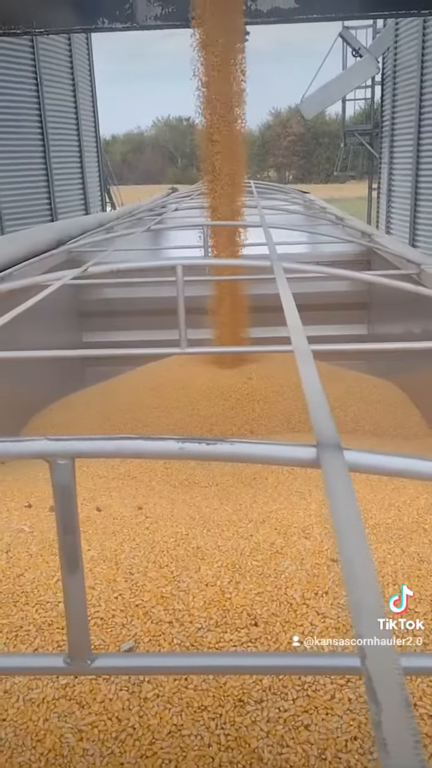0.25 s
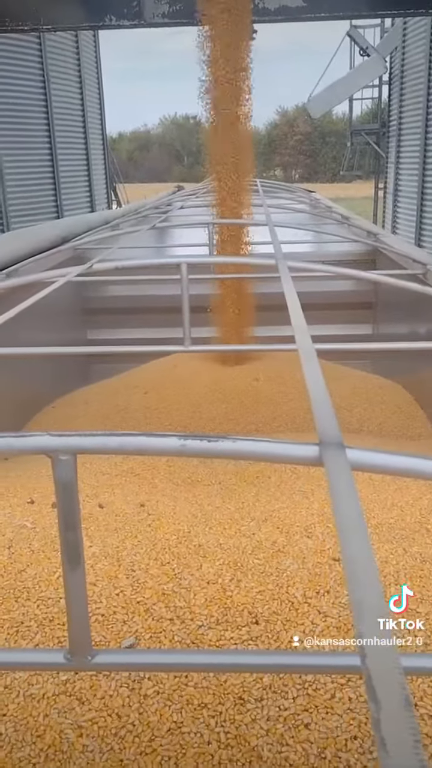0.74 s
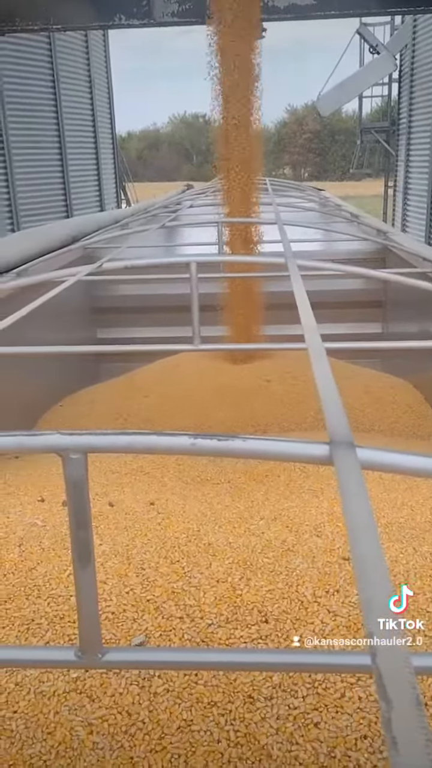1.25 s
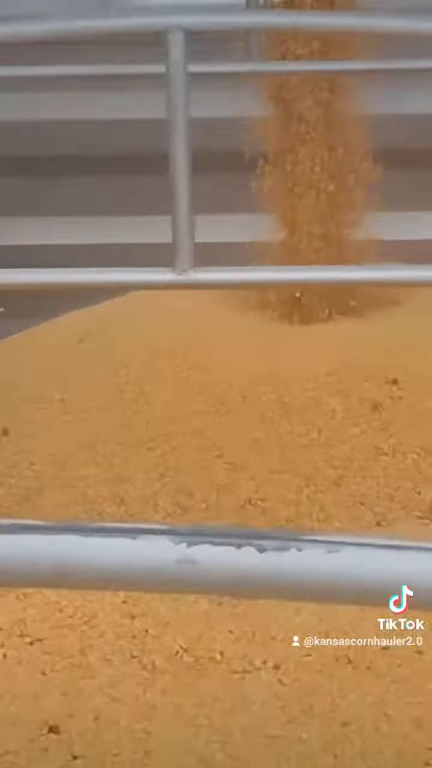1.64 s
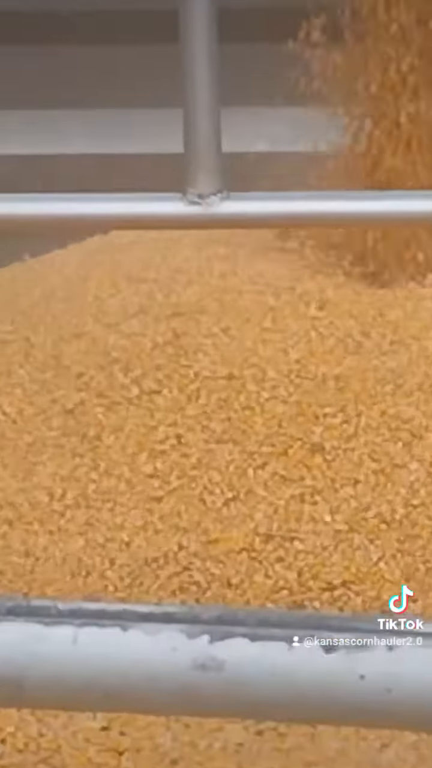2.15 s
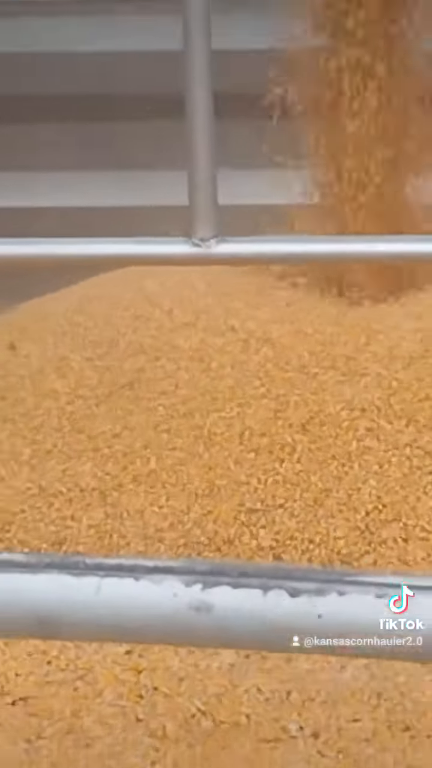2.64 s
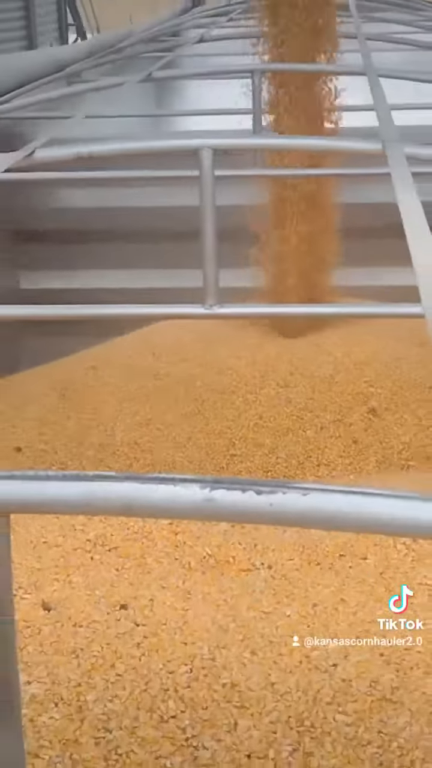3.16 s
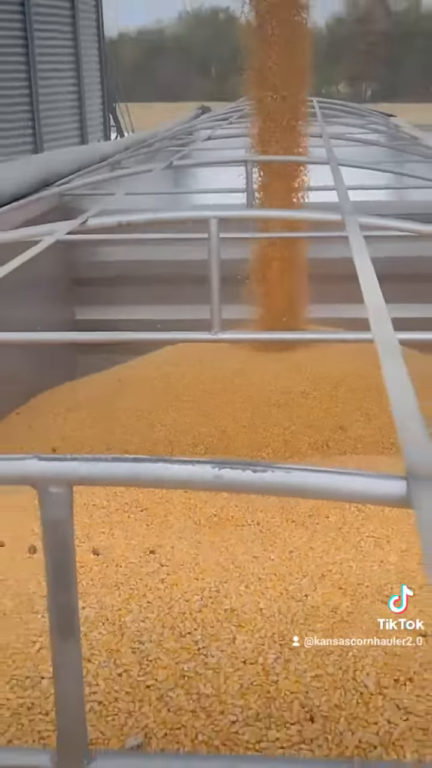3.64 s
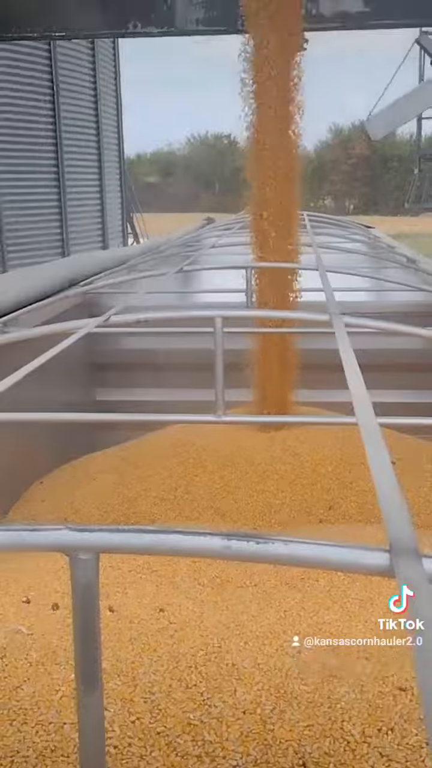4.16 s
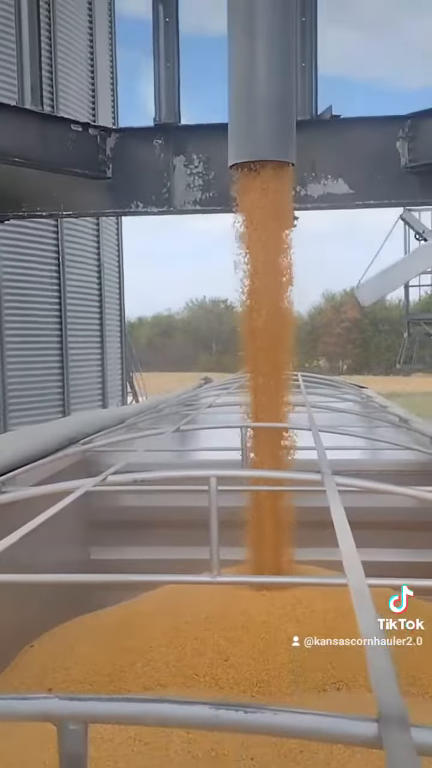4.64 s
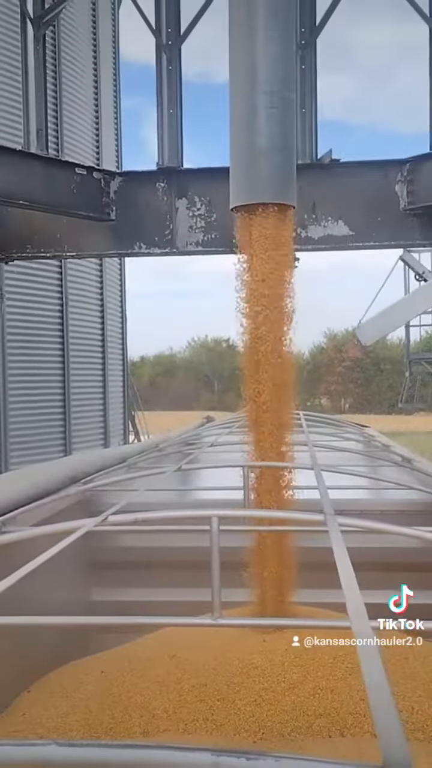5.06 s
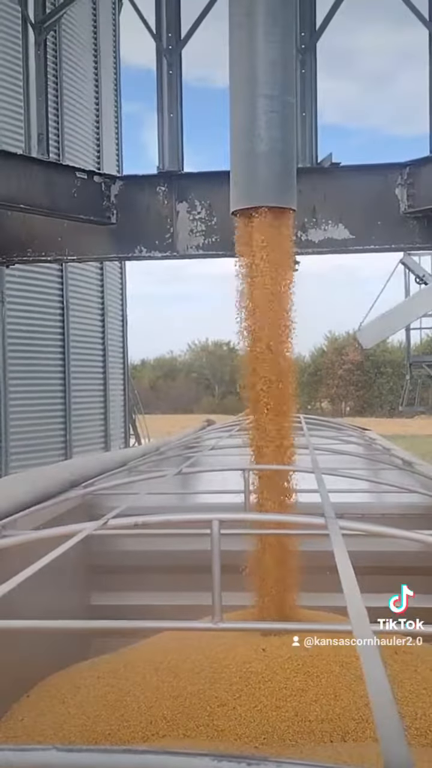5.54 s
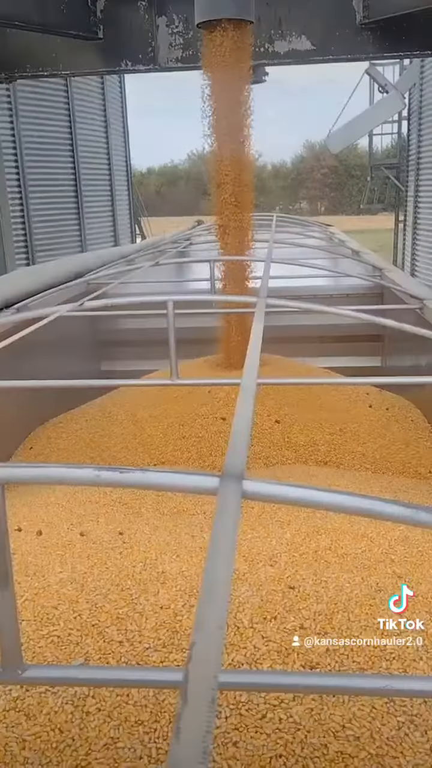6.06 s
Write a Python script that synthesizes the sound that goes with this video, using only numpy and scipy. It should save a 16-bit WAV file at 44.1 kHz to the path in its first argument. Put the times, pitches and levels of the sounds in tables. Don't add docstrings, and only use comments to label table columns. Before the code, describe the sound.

A continuous torrent of shelled corn falls onto a heap in a steel trailer outdoors: bright, grainy hiss and kernel clatter, dull wall drumming, low conveyor and fan hum. It starts loud, then sinks within two seconds as the microphone adjusts. Tiny metallic ticks and low wind buffets pass. Near the end everything cuts to silence for a third of a second, then fades back louder.

```python
import sys
import numpy as np
from scipy import signal
from scipy.fft import rfft, irfft, next_fast_len
from scipy.io import wavfile
from scipy.ndimage import uniform_filter1d, map_coordinates

SR = 44100
rng = np.random.default_rng(int(sys.argv[2]) if len(sys.argv) > 2 else 0)


def store_wav(level_fs):
    pcm = np.round(np.clip(np.atleast_2d(level_fs), -1, 1) * 32767)
    wavfile.write(sys.argv[1], SR, pcm.T.astype(np.int16))


def makeup_ratio(level_db):
    decades = np.asarray(level_db, float) / 20
    return 10 ** decades


N = 277918


def unit(x):
    return x / np.sqrt(np.mean(x ** 2) + 1e-20)


def along(points, hz):
    f, v = np.transpose(points)
    return np.interp(np.log(hz + 1), np.log(f + 1), v)


def curves(tables):
    s, *cols = np.transpose(np.concatenate(tables))
    return [np.interp(np.arange(N) / SR, s, c) for c in cols]


def wobble(rate_hz):
    knots = rng.standard_normal(int(N * rate_hz / SR) + 4)
    return map_coordinates(knots, [np.arange(N) * rate_hz / SR])


def pan(left_right_db):
    return makeup_ratio(left_right_db * np.array([[.5], [-.5]]))


def filtered(x, response):
    m = next_fast_len(N + 8192)
    return irfft(rfft(x, m) * response(np.fft.rfftfreq(m, 1 / SR)), m)[..., :N]


# (frequency [Hz], correlation [-1 to 1])
PORT_LIKENESS = [(60, 0.91), (400, 0.89), (900, 0.35), (1300, 0.48), (1750, 0.058), (2200, 0.071),
                 (2700, 0.15), (3600, 0.11), (4400, 0.071), (5600, 0.17), (7500, 0.27), (10500, .08),
                 (12000, 0.36), (15000, .25)]
# (frequency [Hz], lead [rad])
RIGHT_LEAD = [(60, 0.08), (700, 0.63), (1500, 2.5), (2000, 0), (3600, 0.2), (6000, -1.7), (7500, 0.5),
              (8800, -1.2), (11000, -0.4), (12500, -1.2), (15000, -1.6)]


def stereo(pair, gain):
    def mid_side_gain(hz):
        angle = np.arccos(np.clip(along(PORT_LIKENESS, hz), -1, 1)) / 2
        return gain(hz) * [np.cos(angle), np.sin(angle)]

    def lead(hz):
        return np.exp(.5j * along(RIGHT_LEAD, hz) * np.array([[-1], [1]]))

    mid, side = filtered(pair, mid_side_gain)
    return unit(filtered(np.array([mid + side, mid - side]), lead))


def impacts(spectrum, spiky_db, patchy_db):
    size_db = spiky_db * np.minimum(rng.exponential(size=(2, N)), 5)
    clicks = rng.standard_normal((2, N)) * makeup_ratio(size_db)
    cells = signal.stft(clicks, nperseg=512)[2]
    patches = uniform_filter1d(rng.standard_normal(cells.shape[1:]), 6, 0)
    patches = unit(uniform_filter1d(patches, 12, 1))
    pair = signal.istft(cells * makeup_ratio(patchy_db * patches), nperseg=512)[1][:, :N]
    return stereo(pair, lambda hz: makeup_ratio(along(spectrum, hz)))


# (start [s], end [s])
DROPOUT = (5.516, 5.8625)
SETTLE_FROM_S, SETTLE_S = 0.72, 1


def settled():
    t = np.arange(N) / SR
    u = np.clip((t - SETTLE_FROM_S) / SETTLE_S, 0, 1)
    return u * u * (3 - 2 * u) * (t < DROPOUT[1])


# (time [s], raise [0-1])
RAISE = [
    [(0, 0.46), (3.6, 0.64), (4.3, 0.8), (5.5, 1), (5.87, 0.3), (6.3, 0.2)],
]


def phone_raised():
    return curves(RAISE)[0]


HISS_DB, SETTLED_DB = -20.5, -8
CLATTER_DB, SETTLED_CLATTER_DB, RAISED_CLATTER_DB = -6, -3.5, -0.44
WALLS_DB, SETTLED_WALLS_DB, RAISED_WALLS_DB, RESUMED_WALLS_DB = -4.5, 1.5, 0.5, 2.7
CLATTER_LAG = 1.7
# (frequency [Hz], density [dB per Hz])
HISS = [(4200, -42), (5500, -17.5), (6500, -3), (8600, -1.5), (10300, -1), (12500, 1), (14000, -2)]
# (frequency [Hz], density [dB per Hz])
CLATTER = [(1700, -36.5), (2400, -11.5), (3200, -3), (3900, -1), (5000, -1.5), (5900, -0.5), (7000, -4),
           (9000, -51.5)]
# (frequency [Hz], density [dB per Hz])
WALLS = [(190, -32), (330, -10.5), (408, -3.5), (444, -1.5), (483, -6.5), (634, -10.5), (1010, -11.5),
         (1110, -14), (1280, -10.5), (2500, -18.5), (3250, -25), (5500, -120)]
# (time [s], level [dB re steady])
FLOW = [(0, -1.5), (.1, -0.5), (.4, .5), (.75, 0), (1.7, .5), (2.4, 0.5), (3.1, .5), (3.3, 0), (3.8, 0.3),
        (4.3, -0.5), (4.8, 0.4), (5.1, 0), (5.5, 0.2), (5.87, -.5), (6.3, -1.5)]


def corn():
    down, raised = settled(), phone_raised()
    resumed = np.arange(N) / SR > DROPOUT[1]
    stream_db = HISS_DB + SETTLED_DB * down + curves([FLOW])[0] + 0.39 * wobble(9) + 0.26 * wobble(22)
    clatter_db = CLATTER_DB + SETTLED_CLATTER_DB * down ** CLATTER_LAG + RAISED_CLATTER_DB * raised
    walls_db = WALLS_DB + SETTLED_WALLS_DB * down + RAISED_WALLS_DB * raised + RESUMED_WALLS_DB * resumed
    hiss = impacts(HISS, spiky_db=2.5, patchy_db=0.82)
    clatter = makeup_ratio(clatter_db) * impacts(CLATTER, spiky_db=3, patchy_db=-0.56)
    walls = makeup_ratio(walls_db) * impacts(WALLS, spiky_db=2.5, patchy_db=0.6)
    return makeup_ratio(stream_db) * (hiss + clatter + walls)


# (time [s], peak [dB], frequency [Hz], left-right [dB])
PINGS = [
    (0.3047, -20.5, 11300, -2.5),
    (0.651, -10.5, 11100, -3.5),
    (1.0236, -15, 11560, -1.5),
    (2.2094, -22.5, 11700, 4),
    (2.3264, -15, 11200, 0),
    (2.3979, -15, 11100, -0.5),
    (2.9073, -19, 10900, -5),
    (3.9353, -18, 11100, 0.5),
    (4.7994, -26, 10400, -2.5),
]


def pings():
    out = np.zeros((2, N + SR))
    t = np.arange(SR // 50) / SR
    for s, db, hz, pan_db in PINGS:
        envelope = (1 - np.exp(-t / .0004)) * makeup_ratio(-60 * t / .008)
        ring = np.sin(2 * np.pi * hz * t) * envelope
        start = round(s * SR)
        out[:, start:start + len(t)] += makeup_ratio(db + 1.5) * pan(pan_db) * ring
    return out[:, :N]


MACHINE_DB, SETTLED_MACHINE_DB = -0.06, 0.37
# (frequency [Hz], density [dB per Hz])
RUMBLE = [(18, -60), (30, -36), (44, -12), (86, -3), (123, -3.5), (157, 1), (265, -4.5), (350, -16),
          (460, -39), (770, -120)]
# (frequency [Hz], width [Hz], level [dB re hiss], left-right [dB])
TONES = [(165.9, 2.9, -11.5, 0.5), (205.9, 3.3, -9, 1), (266, 23, -15, -4.5), (454, 21, -19, 0.5),
         (596, 7.1, -22.5, 0.5), (1041, 7.8, -20, -0.5), (1170, 7.9, -31, 4)]
# (time [s], level [dB re steady])
LOAD = [(0, -1), (.3, 2), (.75, -1.5), (1.2, -1), (1.6, 1), (2.3, 0), (2.8, 1), (3.35, 0), (3.6, 2.5),
        (4.2, 0.5), (4.7, 1), (5.1, 0.5), (5.5, -0.5), (5.9, 2), (6.05, -1), (6.3, 3.5)]


def machinery():
    down = settled()
    rumble_db = MACHINE_DB + SETTLED_MACHINE_DB * down + 0.44 * wobble(6) + 0.23 * wobble(6)
    hum = makeup_ratio(rumble_db) * impacts(RUMBLE, spiky_db=2.0, patchy_db=-0.72)
    for hz, width_hz, db, pan_db in TONES:
        line = lambda f: 1 / (1 + ((f - hz) / width_hz) ** 2)
        tone = stereo(rng.standard_normal((2, N)), line)
        hum = hum + makeup_ratio(db) * pan(pan_db) * tone
    return makeup_ratio(HISS_DB + SETTLED_DB * down + curves([LOAD])[0]) * hum


CALM_DB = -43
# (time [s], peak [dB], half-length [s], left-right [dB])
GUSTS = [(0, -25.5, 0.032, 4.5), (0.118, -26.5, 0.049, -4.5), (0.333, -18, .035, -1.5),
         (0.412, -24, 0.053, 5), (0.643, -24.5, .06, -5.5), (.8, -30.5, .05, -1.5),
         (0.937, -28, 0.026, -3.5), (1.036, -25, 0.054, 3.5), (1.3, -34, 0.078, 9.5),
         (1.442, -36.5, .04, 1.5), (2.02, -31, 0.042, -6.5), (2.183, -33, 0.058, 9),
         (2.294, -32.5, 0.073, -7), (2.495, -27, 0.054, -8), (2.75, -36.5, 0.091, 1.5),
         (3.05, -33, .08, 0.5), (3.52, -35, 0.044, -9.5), (3.716, -32.5, 0.06, 5),
         (3.872, -26, 0.034, 12.5), (4.02, -35.5, .05, 4.5), (4.19, -36.5, .04, -8.5),
         (5.46, -35, 0.058, -1.5), (6.053, -38, .06, 5.5), (6.15, -34.5, 0.037, -2.5),
         (6.29, -28, 0.049, 11.5)]
# (frequency [Hz], density [dB per Hz])
BUFFET = [(22, -26), (40, -21.5), (55, -7.5), (80, 8), (140, 1), (260, -31)]


def wind():
    t = np.arange(N) / SR
    strength = makeup_ratio(CALM_DB)
    for s, db, half_s, pan_db in GUSTS:
        swell = np.exp(-.5 * ((t - s) / half_s) ** 2)
        strength = strength + makeup_ratio(db) * pan(pan_db) * swell
    shared = 1.14 * rng.standard_normal(N)
    push = rng.standard_normal((2, N)) + shared
    push = unit(filtered(push, lambda hz: makeup_ratio(along(BUFFET, hz))))
    lumps_db = 2.95 * np.array([wobble(24.89), wobble(24.92)])
    return strength * makeup_ratio(lumps_db) * push


def scene():
    return corn() + pings() + machinery() + wind()


# (frequency [Hz], gain [dB])
SPOUT_GAIN = [(7800, 0.5), (8600, 6.5), (9300, 0), (12000, 2), (13200, 5), (14300, 9)]


def aim(dry):
    facing = filtered(dry[1], lambda hz: makeup_ratio(along(SPOUT_GAIN, hz)))
    right = dry[1] + phone_raised() * (facing - dry[1])
    return np.array([dry[0], right])


TOP_HZ = 15510
# (frequency [Hz], rise [dB])
CAPSULE = [(12500, 0), (13500, 2), (14600, 2.5), (15300, 4)]
# (frequency [Hz], left-right [dB])
BALANCE = [(60, 1.5), (300, 1.5), (700, 1.5), (1400, -3.5), (2300, 0), (4000, 0), (6600, 0.5), (9500, 2),
           (13000, 1.5), (15000, 8.5)]


def ports(x):
    def response(hz):
        return makeup_ratio(along(CAPSULE, hz)) * pan(along(BALANCE, hz)) * (hz < TOP_HZ)

    return filtered(x, response)


# (frequency [Hz], level [dB re treble])
STARVED = [(2000, -22), (2900, -11), (3500, -5.5), (4200, -6.3), (5000, -4.8), (5500, -5.5), (6000, -10),
           (7000, -30)]


def starve(x):
    hz, _, cells = signal.stft(np.array([x[0] + x[1], x[0] - x[1]]) / 2, SR, nperseg=2048)
    power = np.abs(uniform_filter1d(np.abs(cells) ** 2, size=2, axis=2)) + 1e-20
    treble = power[:, (hz > 6000) & (hz < 15000)].mean(axis=1, keepdims=True)
    margin_db = 10 * np.log10(power / treble) - along(STARVED, hz)[:, None]
    kept = cells * np.clip(.5 + margin_db, 0, 1)
    mid, side = signal.istft(kept, SR, nperseg=2048)[1][:, :N]
    return np.array([mid + side, mid - side])


FADE_S, FADE_START, FADE_BEND = .25, 0.1, 0.79


def dropout_gate():
    t = np.arange(N) / SR
    after_s = t - DROPOUT[1]
    gate = np.clip(np.maximum(DROPOUT[0] - t, after_s) / .001, 0, 1)
    fade = FADE_START + (1 - FADE_START) * np.abs(after_s / FADE_S) ** FADE_BEND
    return gate * np.where(after_s > 0, np.clip(fade, 0, 1), 1)


def low_pass(x):
    return signal.sosfilt(signal.butter(12, 16850, fs=SR, output="sos"), x)


CEILING, KNEE = .99, 9


def record(dry):
    x = starve(ports(aim(dry)))
    x = x / (1 + np.abs(x / CEILING) ** KNEE) ** (1 / KNEE)
    return low_pass(x * dropout_gate())


dry = scene()
out = record(dry)
store_wav(out)
```